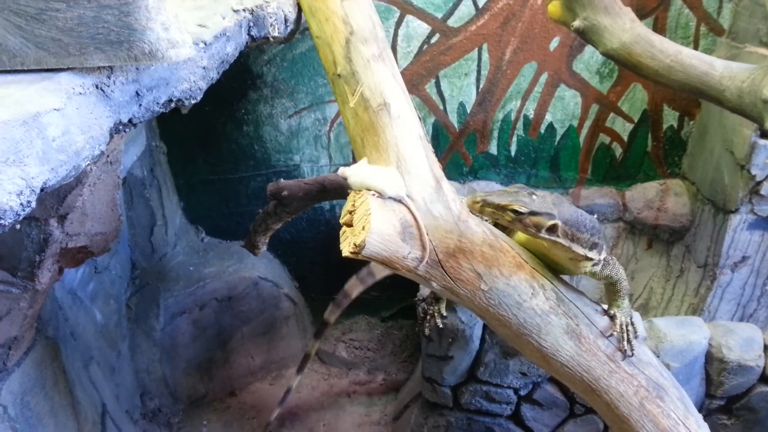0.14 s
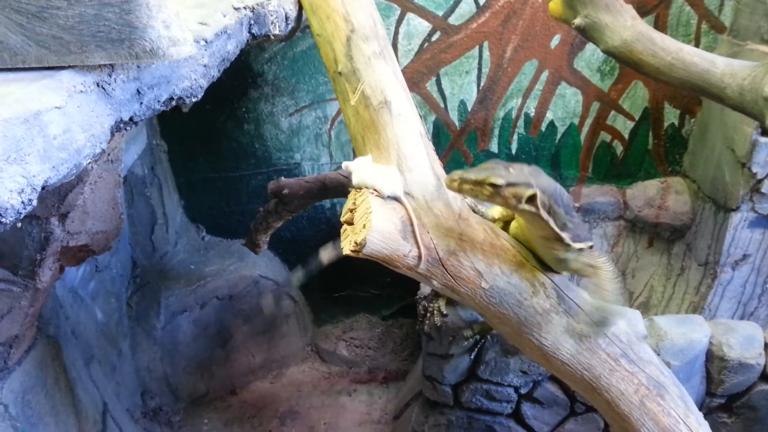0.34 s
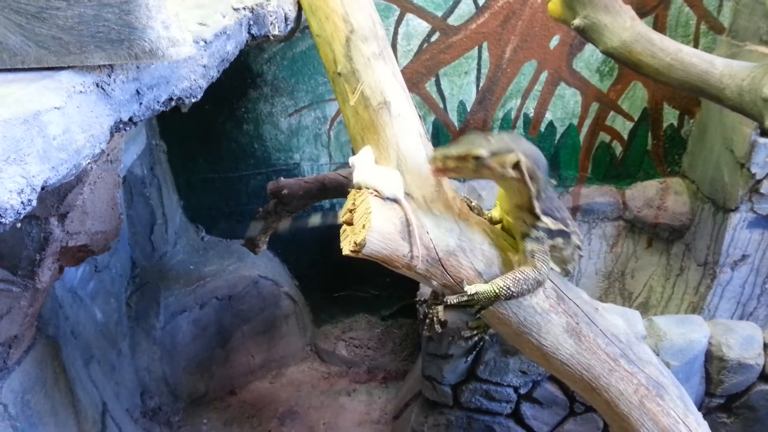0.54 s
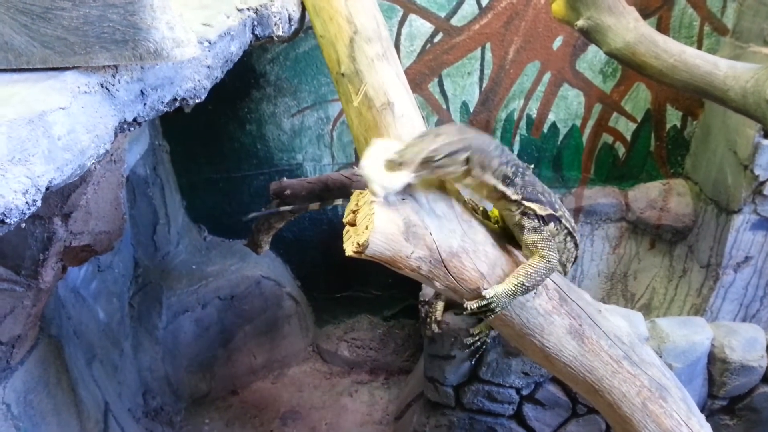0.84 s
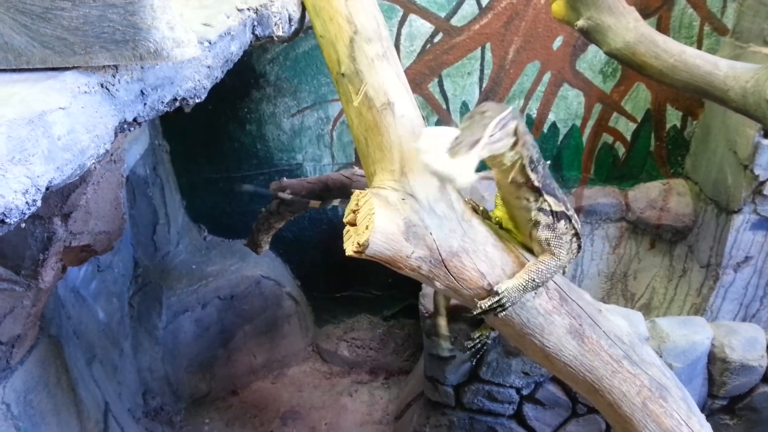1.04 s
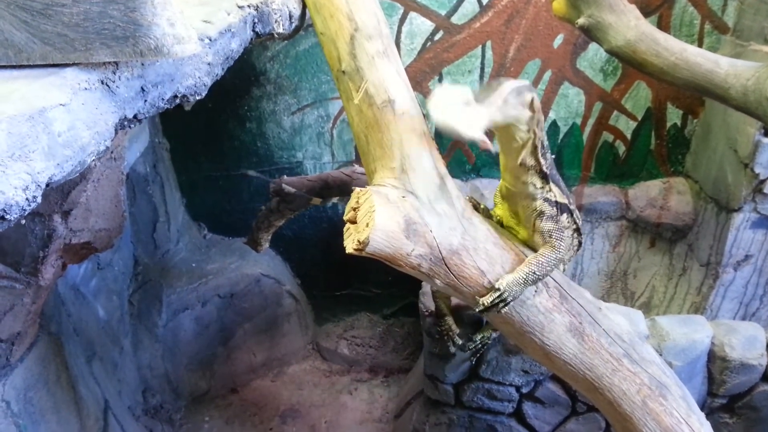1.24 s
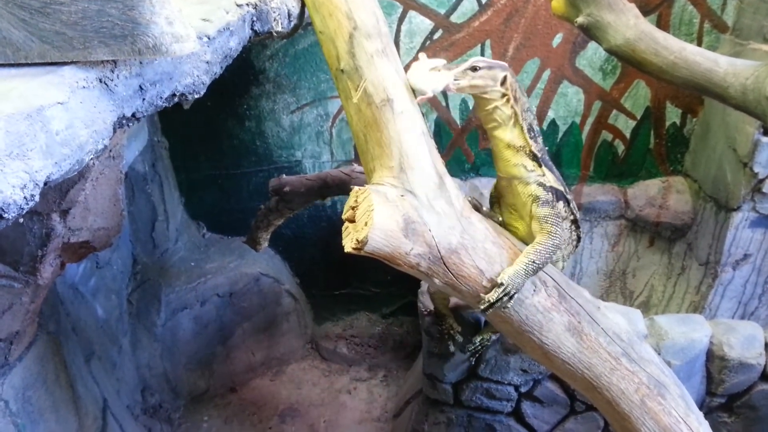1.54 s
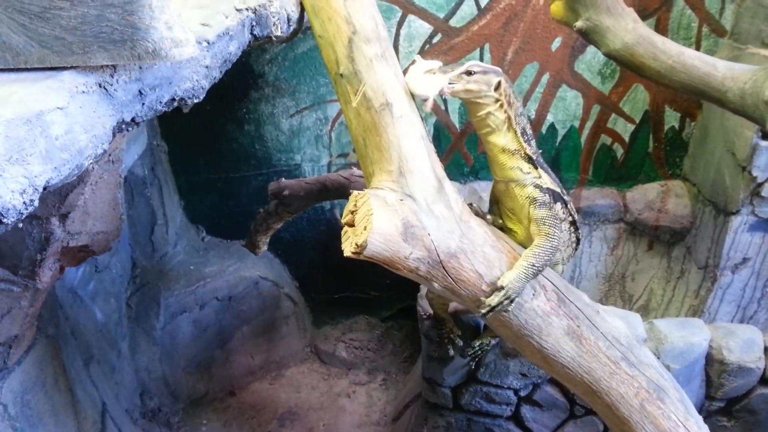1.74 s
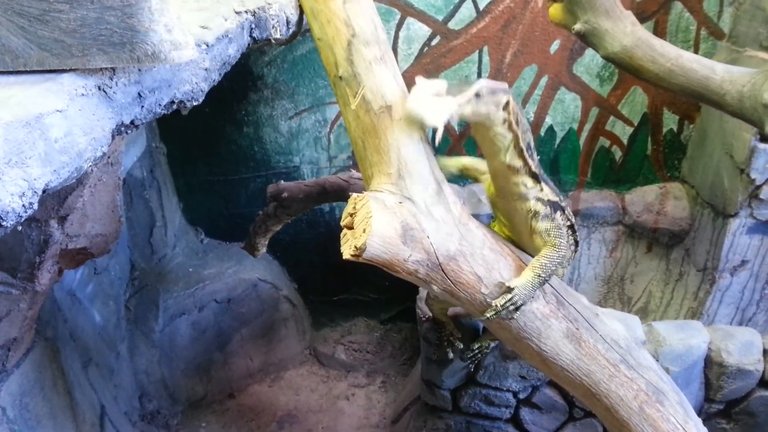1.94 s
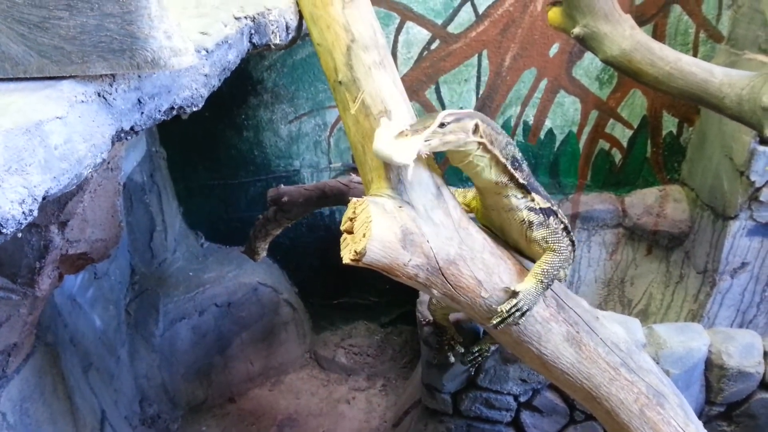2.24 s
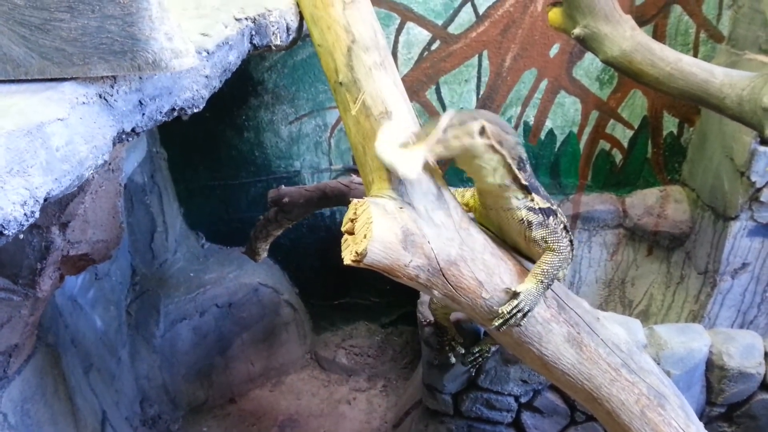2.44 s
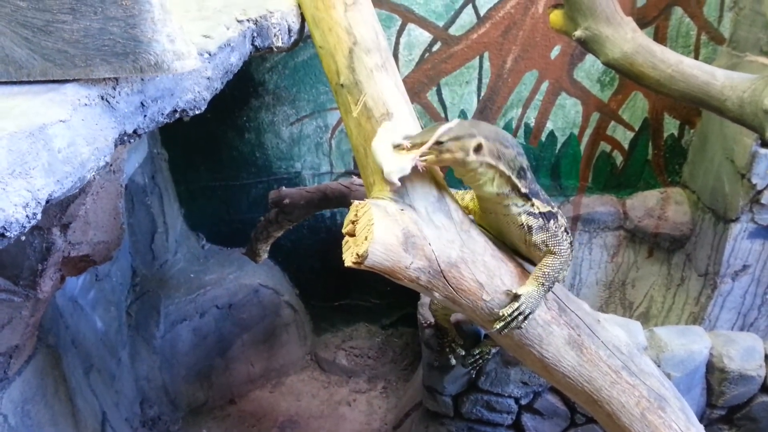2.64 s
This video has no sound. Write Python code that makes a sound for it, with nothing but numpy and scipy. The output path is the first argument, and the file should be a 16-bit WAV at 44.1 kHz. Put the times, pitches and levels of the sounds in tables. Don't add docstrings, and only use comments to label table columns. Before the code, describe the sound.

A mouse squeals five times, piercing and raspy, in a lizard's jaws over a low fan hum

```python
import sys
import numpy as np
from scipy import signal
from scipy.fft import rfft, irfft
from scipy.io import wavfile

SR = 44100
rng = np.random.default_rng(int(sys.argv[2]) if len(sys.argv) > 2 else 0)


def unload_wav(signal):
    wavfile.write(
        sys.argv[1],
        SR,
        np.round(np.clip(np.atleast_2d(signal).T, -1, 1) * 32767).astype(np.int16),
    )


def makeup_ratio(level_db):
    decades = np.asarray(level_db, float) / 20
    return 10 ** decades


N = 123479


def evened(x):
    return x / np.sqrt(np.mean(x ** 2) + 1e-20)


def read(points, hz):
    f, value = np.transpose(points)
    return np.interp(np.log(hz + 1), np.log(f + 1), value)


def add(mix, s, sound):
    part = mix[round(s * SR):][:len(sound)]
    part += sound[:len(part)]


def colour(x, gain):
    return irfft(rfft(x) * gain(np.fft.rfftfreq(x.shape[-1], 1 / SR)), x.shape[-1])


def drift(count, hz):
    r = np.exp(-2 * np.pi * hz / SR)
    wander = signal.lfilter([1], [1, -2 * r, r * r], rng.standard_normal(count + 2000))
    return evened(wander[2000:])


def band(f, hz, spread):
    return np.exp(-(np.log2((f + 1) / hz) / spread) ** 2 / 2)


def squeal(pitch, voice):
    overtones_db = [-12.5, -4, -15.5]
    halves_db = [-34, -3.5, -12, -23]
    # frequency in Hz, level in dB.
    hiss_colour = [(3700, -10.5), (4600, -26), (6000, -11), (7500, -1), (9500, -4.5), (12000, -6.5),
                   (15000, -11)]
    hoarse = 0.5
    slip_rad = 1.25
    rise_s, fall_s = 0.002, 0.008
    flutter_db = 1.3
    rasp, rasp_hz = 1.13, 390

    s, hz, shake = np.transpose(pitch)
    effort_db, half_db, hiss_db = np.transpose(voice)
    t = np.arange(s[0], s[-1], 1 / SR)
    count = len(t)
    hiss = makeup_ratio(np.interp(t, s, hiss_db))
    unsteady = 1 + np.interp(t, s, shake) * drift(count, 374)
    turns = np.cumsum(np.interp(t, s, hz) * unsteady) / SR

    whole = np.zeros(count)
    for k, db in enumerate(overtones_db):
        line = makeup_ratio(db) * np.sin(2 * np.pi * (k + 1) * turns)
        whole += line / (1 + (k == 0) * hoarse * hiss)
    halves = np.zeros(count)
    for k, db in enumerate(halves_db):
        halves += makeup_ratio(db) * np.sin(2 * np.pi * (k + .5) * turns + slip_rad * drift(count, 180))
    halves *= makeup_ratio(np.interp(t, s, half_db) + 0.81 * drift(count, 310))
    roughness = makeup_ratio(flutter_db * drift(count, 180)) + rasp * hiss * drift(count, rasp_hz)
    folds = (whole + halves) * roughness

    breath = evened(colour(rng.standard_normal(count), lambda f: makeup_ratio(read(hiss_colour, f))))
    breath = 0.65 * hiss * breath * makeup_ratio(3.3 * drift(count, 250))
    fade = np.clip(np.minimum((t - s[0]) / rise_s, (s[-1] - t) / fall_s), 0, 1)
    effort = makeup_ratio(np.interp(t, s, effort_db) + 0.5)
    return s[0], fade * effort * (folds + breath) / np.sqrt(1 + hiss ** 2)


def mouse():
    # time in seconds, pitch in Hz, unsteadiness as a share.
    pitch_1 = [(.899, 3250, .02), (.909, 4200, .004), (.919, 4260, .003), (.931, 4090, .003),
               (.946, 4430, .003), (.96, 4590, .004), (.968, 4430, .005), (.978, 4040, .008),
               (.995, 3900, .02)]
    pitch_2 = [(1.109, 3700, .015), (1.115, 4120, .01), (1.13, 4500, .006), (1.15, 4590, .005),
               (1.196, 4335, .004), (1.21, 4280, .004), (1.255, 4320, .006), (1.28, 4150, .015),
               (1.312, 3750, .04)]
    pitch_3 = [(1.465, 3550, .02), (1.473, 3830, .012), (1.497, 4520, .008), (1.52, 4560, .005),
               (1.628, 4580, .004), (1.658, 3930, .012), (1.68, 3900, .008), (1.705, 3900, .022),
               (1.76, 3940, .045)]
    pitch_4 = [(1.951, 3550, .06), (1.975, 3430, .03), (2.0, 3450, .035), (2.03, 3460, .025),
               (2.06, 3540, .011), (2.085, 3570, .009), (2.11, 3630, .007), (2.135, 3680, .015),
               (2.15, 3720, .015)]
    pitch_5 = [(2.398, 2900, .03), (2.414, 4150, .012), (2.425, 4170, .002), (2.477, 4190, .002),
               (2.486, 4350, .003), (2.504, 4230, .004), (2.512, 3600, .006), (2.538, 4270, .01),
               (2.566, 3950, .012)]
    pitch_yelp = [
        (2.145, 3750, .005),
        (2.157, 4040, .005),
        (2.165, 3800, .01),
        (2.175, 3800, .025),
        (2.205, 3950, .04),
    ]
    pitch_croak = [
        (2.56, 3500, .03),
        (2.568, 3550, .035),
        (2.58, 3450, .04),
    ]
    # effort in dB, half-pitch lines in dB, hiss in dB.
    voice_1 = [(-30, -10, 5), (-24.5, -23, -7), (-25, -27, -29), (-47, -11, -23), (-10.5, -40, -41),
               (-21.5, -29, -3.5), (-19, -34, -40), (-28, -15, 0), (-34, -4, -17)]
    voice_2 = [(-22.5, -20, 8), (-12, -38, -11.5), (-10, -39, -19), (-17, -18, -16), (-15.5, -22, -27),
               (-15.5, -19, -15), (-16.5, -23, -11.5), (-17, -35, -13.5), (-19, -1, 4)]
    voice_3 = [(-29, -11, 6), (-17, -22, -3.5), (-16, -15, -23), (-16.5, -13, -12), (-27, -5.5, -16),
               (-22, -3.5, -14), (-24, -8, -10), (-31, 5.5, -2), (-38, -7, 20)]
    voice_4 = [(-26.5, -9, -10), (-23, -6, -7), (-27.5, -7, 6), (-23.5, -8, -10), (-27, -6, -1.5),
               (-26.5, -3, -3), (-26.5, -13, -1), (-22, -14, 1), (-33, -13, 4)]
    voice_5 = [(-37.5, -6, 0), (-17.5, -27, -7), (-28, -13, -9), (-21, -21, -12.5), (-14, -12.5, -24.5),
               (-13, -28, -19), (-19, -19, -10), (-18, -9.5, -7), (-23, -6.5, -10)]
    voice_yelp = [
        (-12, -25, 1),
        (-16.5, -28, -14),
        (-13, -17, -10),
        (-23.5, -5, 1),
        (-49, -8, -5),
    ]
    voice_croak = [
        (-11, -17, 4),
        (-21.5, -18, -23),
        (-31, -15, -4),
    ]
    cries = [(pitch_1, voice_1), (pitch_2, voice_2), (pitch_3, voice_3), (pitch_4, voice_4),
             (pitch_5, voice_5), (pitch_yelp, voice_yelp), (pitch_croak, voice_croak)]
    out = np.zeros(N)
    for pitch, voice in cries:
        add(out, *squeal(pitch, voice))
    return out


def swing(cry):
    # time in seconds, treble in dB, left port in dB.
    facing = [(0.898, 1.5, 3.5), (1.1, 1, 1), (1.19, -4, 1), (1.25, 3, 4.5), (1.5, -3, -1.5),
              (1.72, 11, -17), (1.95, 1, 1), (2.0, -5, 3), (2.04, 4.5, 2), (2.11, 20, 5.5), (2.17, -7, -22),
              (2.4, 19, 1.5), (2.47, 18, 10), (2.52, -2, -28), (2.58, -18, -24)]
    treble_hz = 9800
    s, treble_db, left_db = np.transpose(facing)
    t = np.arange(N) / SR
    treble = colour(cry, lambda f: 1 / (1 + (treble_hz / (f + 1)) ** 20))
    turned = cry + (makeup_ratio(np.interp(t, s, treble_db)) - 1) * treble
    return turned, makeup_ratio(np.interp(t, s, left_db))


def open_mouth(cry):
    # time in seconds, level of the low part in dB.
    mouth = [(.9, 5.5), (.97, 3), (1.0, 25.5), (1.12, -6.5), (1.28, -1.5), (1.31, -12), (1.48, -3.5),
             (1.62, 4), (1.7, 1.5), (1.96, -4), (2.08, -2.5), (2.14, 6), (2.16, -8), (2.4, 3), (2.43, 3),
             (2.5, -5.5), (2.56, -5.5)]
    mouth_hz = 5000
    low = colour(cry, lambda f: 1 / (1 + (f / mouth_hz) ** 20))
    return cry + (makeup_ratio(np.interp(np.arange(N) / SR, *np.transpose(mouth))) - 1) * low


def claws():
    # start in seconds, level in dB, centre in Hz, decay in seconds.
    ticks = [
        (0.504, -26.5, 3330, 0.0077),
        (0.592, -16.5, 10500, 0.00068),
        (.6, -31, 8000, 0.0018),
        (0.619, -45, 7800, 0.003),
        (.772, -29.5, 7100, 0.002),
        (0.861, -31.5, 10900, 0.0025),
    ]
    # frequency in Hz, level in dB, time to fall 60 dB in seconds.
    knock = [(1230, -22, 0.11), (2240, -36, .09)]
    # start in seconds, length in seconds, level in dB, centre in Hz.
    scrapes = [
        (0.224, 0.067, -34.5, 2460),
        (0.328, 0.034, -45, 8000),
        (0.601, 0.039, -38.5, 7950),
        (0.651, 0.086, -37.5, 5900),
    ]
    tick_spread, scrape_spread = 0.71, 1.2
    grains_per_s = 9400

    out = np.zeros(N)
    t = np.arange(1500) / SR
    for s, db, hz, decay_s in ticks:
        tick = colour(rng.standard_normal(1500), lambda f: band(f, hz, tick_spread))
        add(out, s, makeup_ratio(db - 1.5) * evened(tick) * np.exp(-t / decay_s))

    t = np.arange(6000) / SR
    ring = sum(makeup_ratio(db - 60 * t / t60) * np.sin(2 * np.pi * hz * t) for hz, db, t60 in knock)
    add(out, 0.252, np.minimum(t / 0.0055, 1) * ring)

    for s, length_s, db, hz in scrapes:
        u = np.arange(0, 1, 1 / (SR * length_s))
        hits = rng.random(9000)[:len(u)] < grains_per_s / SR
        grains = rng.standard_normal(9000)[:len(u)] * hits
        scrape = evened(colour(grains, lambda f: band(f, hz, scrape_spread)))
        add(out, s, makeup_ratio(db) * np.sin(np.pi * u) ** 2 * scrape)
    return out


def bounce(near):
    # delay in seconds, level in dB.
    echoes = [
        (.0026, -11.5),
        (.0061, -34.5),
    ]
    return near + sum(makeup_ratio(db) * np.roll(near, round(lag_s * SR)) for lag_s, db in echoes)


def walls(near):
    # frequency in Hz, time to fall 60 dB in seconds.
    ring_times = [(4000, 0.26), (7000, 0.19), (9000, 0.21), (14000, 0.22)]
    # left in dB, right in dB.
    ring_db = [4, -2.5]
    taps = np.zeros((2, SR // 2))
    at = np.arange(120, SR // 2 - 20, 20)
    at_random = at + rng.integers(0, 20, (2, len(at)))
    np.put_along_axis(taps, at_random, rng.choice([-1., 1.], (2, len(at))), 1)
    hz, t, z = signal.stft(taps, SR, nperseg=256)
    decay = makeup_ratio(-60 * t / read(ring_times, hz)[:, None])
    tail = signal.istft(z * decay, SR, nperseg=256)[1]
    tail *= makeup_ratio(ring_db)[:, None] / np.linalg.norm(tail, axis=1, keepdims=True)
    return signal.fftconvolve(near[None], tail, axes=1)[:, :N]


def fan():
    # frequency in Hz, density in dB per Hz.
    air = [(25, -48), (60, -13), (150, -7.5), (500, -3.5), (900, -10.5), (2400, -14.5), (3200, -23),
           (5000, -36.5)]
    # frequency in Hz, density in dB per Hz.
    fizz = [(2500, -20), (3500, -7), (5000, -3.5), (7000, 0.5), (8500, -9), (11000, -14.5), (13000, -19),
            (15000, -19)]
    # frequency in Hz, width in Hz, level in dB.
    duct = [(68, 7.4, -56), (158.5, 12.6, -43.5), (217.6, 20.6, -41), (323.8, 13, -48), (390.6, 32, -45.5),
            (445.3, 21.5, -44.5), (509, 21, -42.5), (581, 12, -49.5)]
    # frequency in Hz, likeness from 0 to 1.
    likeness = [(60, 0.79), (150, .98), (380, 0.69), (700, 0.62), (1300, 0.009), (15000, 0.039)]
    # frequency in Hz, left minus right in dB.
    balance = [(60, 0.5), (130, 0.5), (290, 2.5), (640, 6), (1400, 3.5), (3000, 2.5), (7000, -5.5),
               (15000, 0)]

    hz = np.fft.rfftfreq(N, 1 / SR)
    power = np.zeros(len(hz))
    for points, db in ((air, -35.5), (fizz, -43.5)):
        shape = makeup_ratio(2 * read(points, hz))
        power += makeup_ratio(2 * db) * shape / np.sum(shape)
    for f, width_hz, db in duct:
        peak = 2 / (1 + (2 * (hz - f) / width_hz) ** 2) ** 2
        power += makeup_ratio(2 * db) * SR / N / (2.8 * width_hz) * peak

    a, b = rfft(rng.standard_normal((2, N)))
    same = np.clip(read(likeness, hz), -1, 1)
    lean = makeup_ratio(read(balance, hz) / 2)
    z = np.array([a * lean, (same * a + np.sqrt(1 - same ** 2) * b) / lean])
    unsteady = makeup_ratio(1.0 + .5 * drift(N, 10.3))
    return unsteady * irfft(z * np.sqrt(power * len(hz)), N)


def scene():
    # frequency in Hz, level in dB.
    left_port = [(3400, -6.5), (4400, -7), (6000, 0), (7000, -6.5), (8500, -5.5), (10000, -9), (13000, -11)]
    # frequency in Hz, level in dB.
    right_port = [(3400, -5), (4400, 1.5), (6000, 7), (7000, 12.5), (8500, 8), (10000, 0), (13000, -3)]
    right_lag_s = 0.00032
    cry, left_gain = swing(mouse())
    near = bounce(open_mouth(cry) + claws())
    direct = np.array([near * left_gain, np.roll(near, round(right_lag_s * SR))])
    heard = direct + walls(near)
    return colour(heard, lambda f: makeup_ratio([read(left_port, f), read(right_port, f)])) + fan()


def drop_masked(x, size=2048, count=64):
    # frequency in Hz, level against the whole in dB.
    faint = [(2000, -55), (2700, -33), (5000, -31), (6000, -36), (9500, -35), (12000, -36), (13500, -31),
             (15000, -31)]
    # frequency in Hz, share from 0 to 1.
    follow = [(6000, .72), (9000, .75), (11500, .75), (13500, .17)]
    usual_db = -37
    shadow_db, up_db_per_oct, down_db_per_oct = -17, 55, 90

    how = dict(window="cosine", nperseg=size, noverlap=size // 2)
    z = signal.stft(x, **how)[2]
    bands = z[:, :-1].reshape(2, count, -1, z.shape[-1])
    power = (abs(bands) ** 2).sum(2)
    hz = (np.arange(count)[:, None] + .5) * SR / 2 / count
    loud_db = 10 * np.log10(power.sum((0, 1)) + 1e-12)
    limit = makeup_ratio(2 * (read(faint, hz) + usual_db + read(follow, hz) * (loud_db - usual_db)))
    octaves = np.log2(hz / hz.T)
    slope_db = np.maximum(up_db_per_oct * octaves, -down_db_per_oct * octaves)
    limit = limit + makeup_ratio(2 * (shadow_db - slope_db)) @ power
    kept = (bands * (power > limit)[:, :, None]).reshape(2, size // 2, -1)
    return signal.istft(np.concatenate([kept, 0 * z[:, -1:]], 1), **how)[1][:, :N]


def band_limit(x):
    return signal.sosfilt(signal.butter(12, 15710, fs=SR, output="sos"), x)


def record(dry):
    ceiling, edge_hz = 0.95, 14650
    bent = ceiling * np.tanh(dry / ceiling)
    low_pass = signal.firwin(301, edge_hz, window=("kaiser", 7), fs=SR)
    limited = signal.oaconvolve(bent, low_pass[None], "same")
    return band_limit(drop_masked(limited))


dry = scene()
out = record(dry)
unload_wav(out)
```